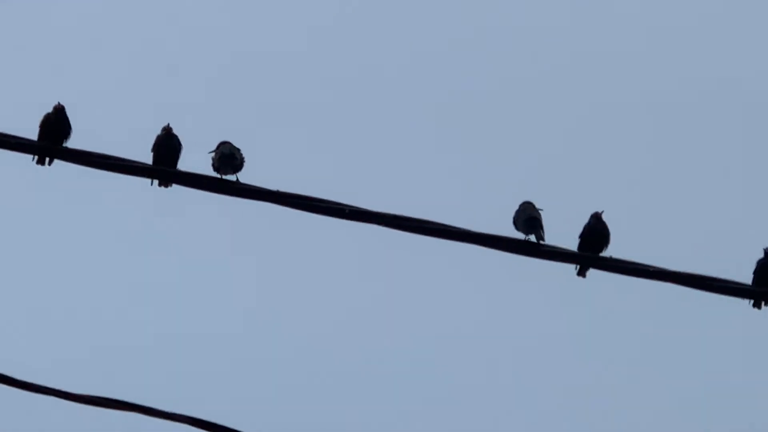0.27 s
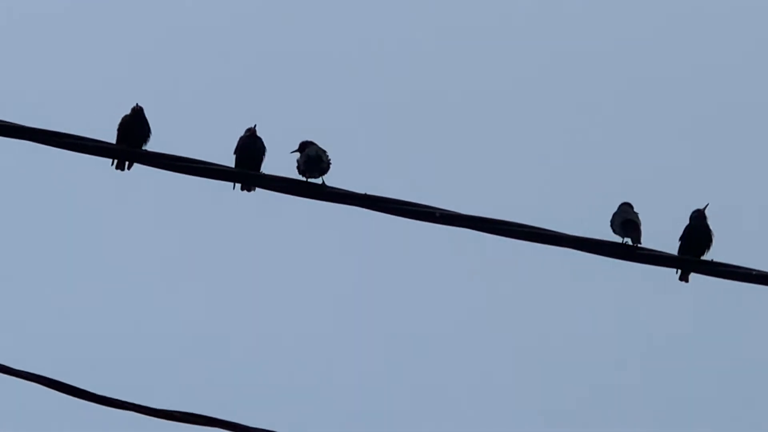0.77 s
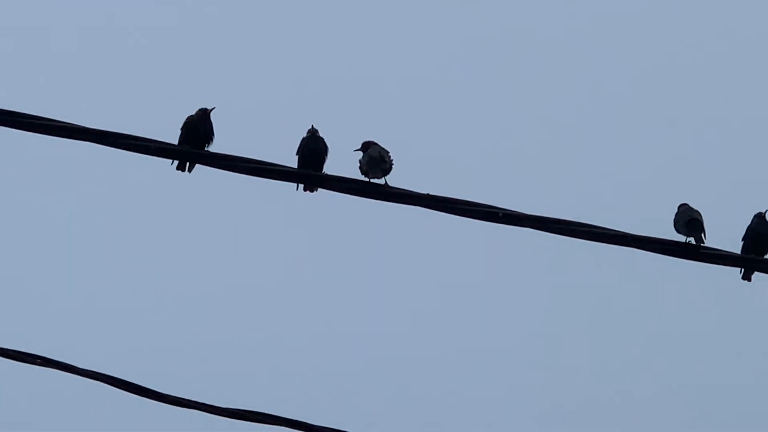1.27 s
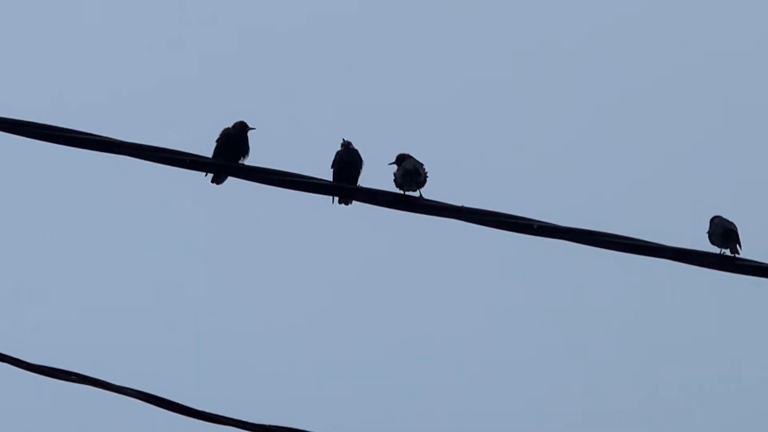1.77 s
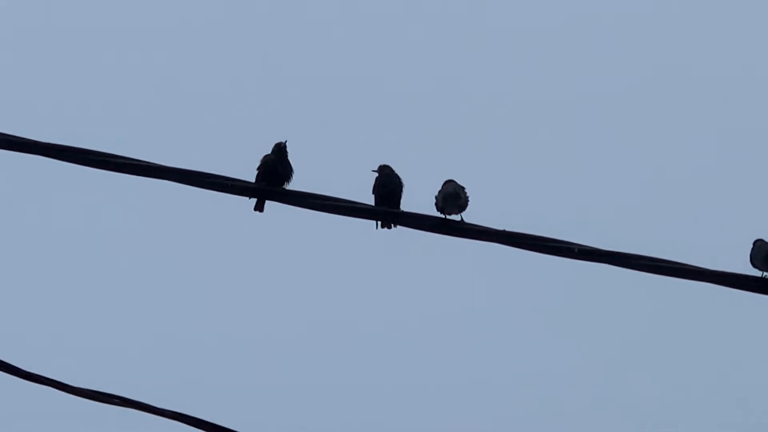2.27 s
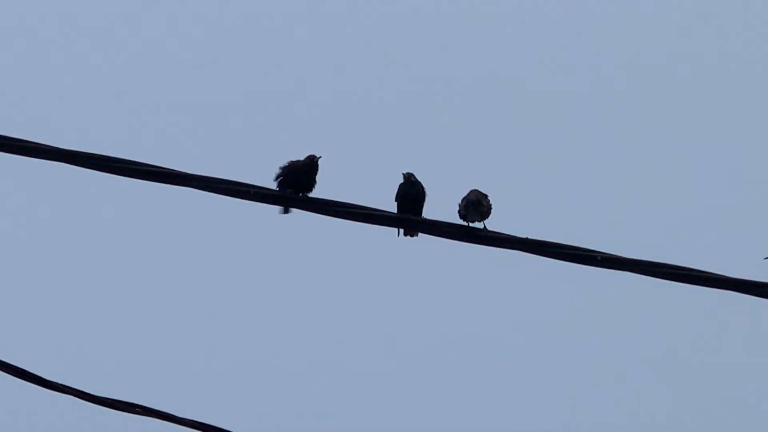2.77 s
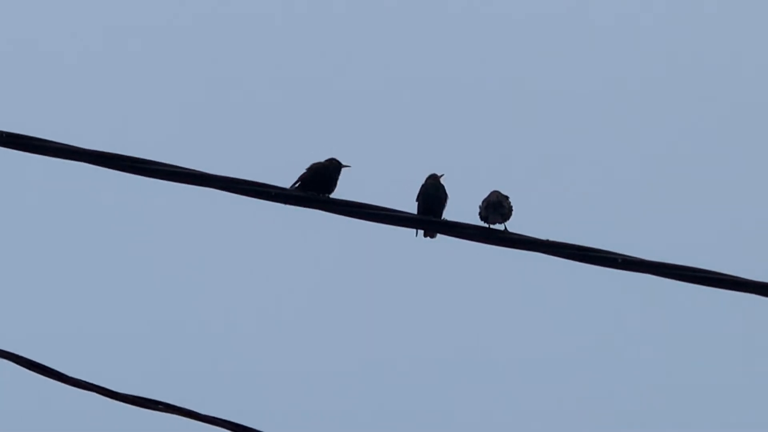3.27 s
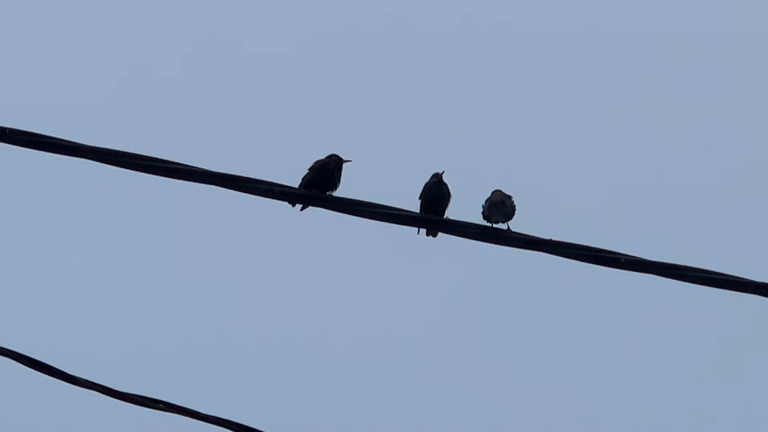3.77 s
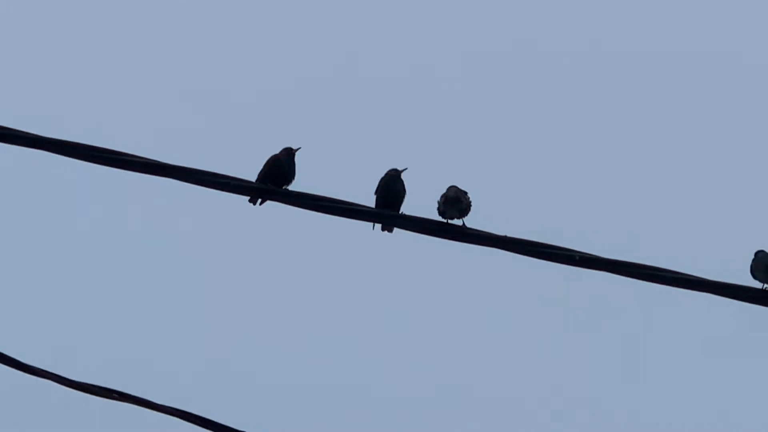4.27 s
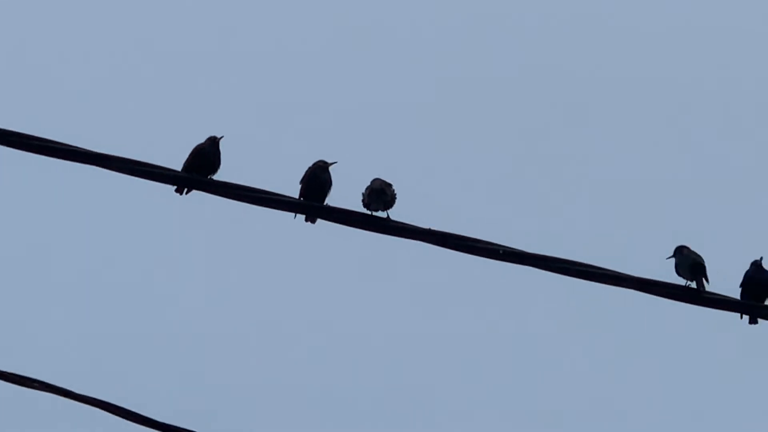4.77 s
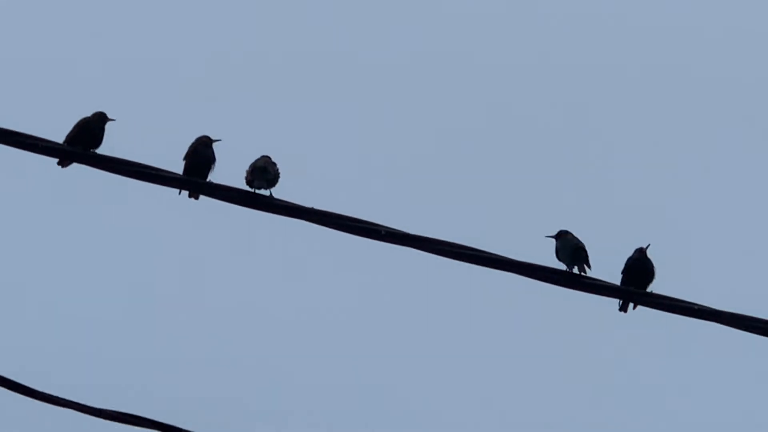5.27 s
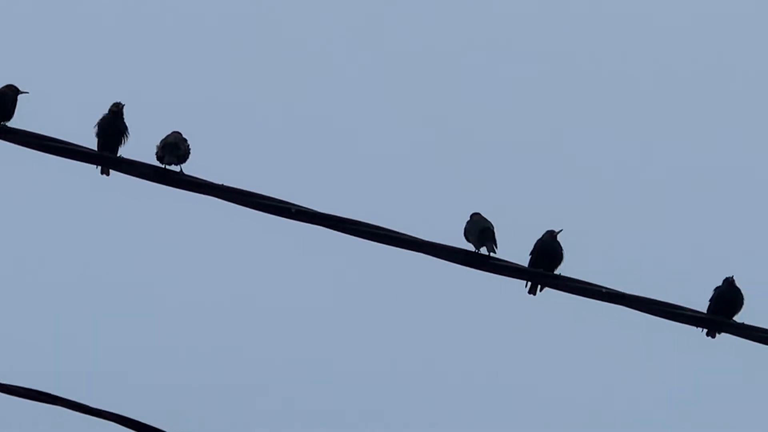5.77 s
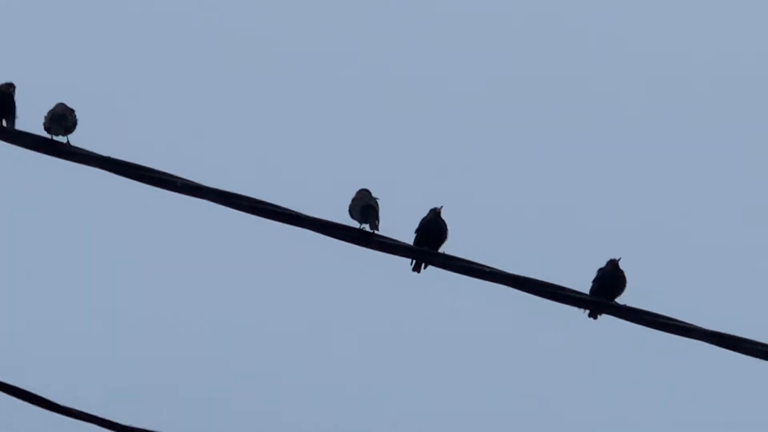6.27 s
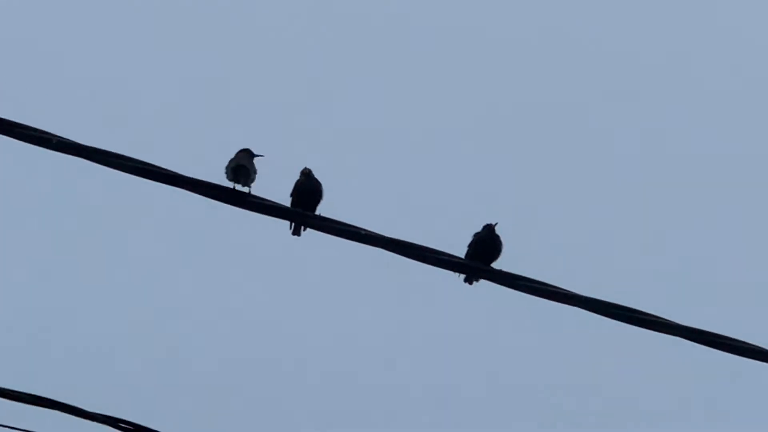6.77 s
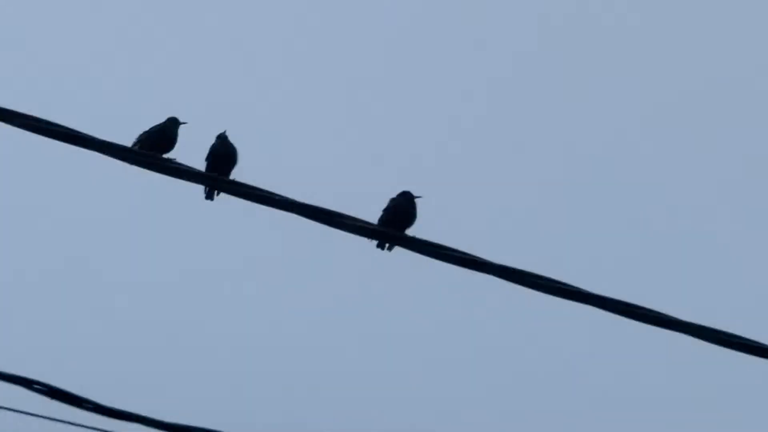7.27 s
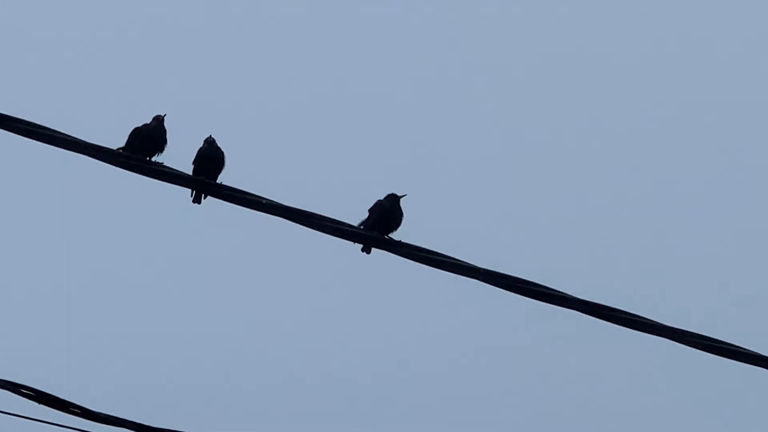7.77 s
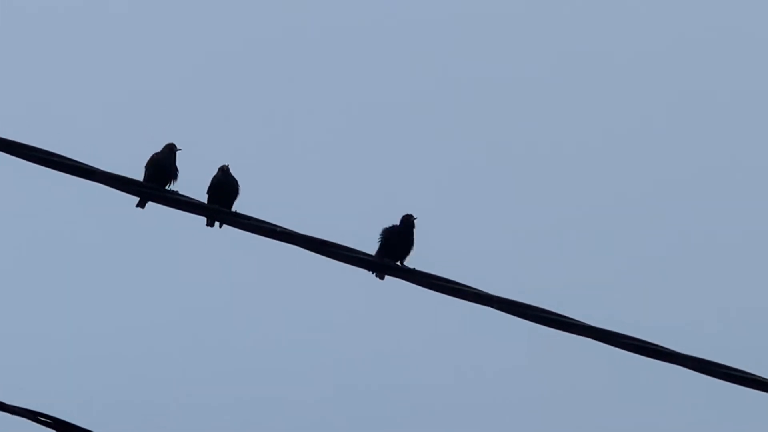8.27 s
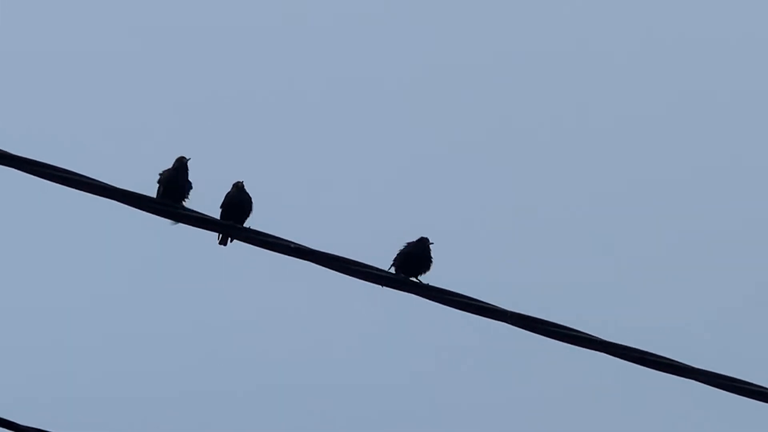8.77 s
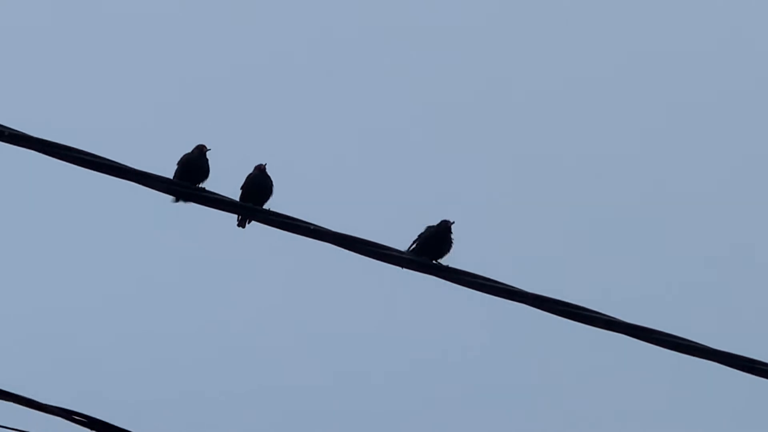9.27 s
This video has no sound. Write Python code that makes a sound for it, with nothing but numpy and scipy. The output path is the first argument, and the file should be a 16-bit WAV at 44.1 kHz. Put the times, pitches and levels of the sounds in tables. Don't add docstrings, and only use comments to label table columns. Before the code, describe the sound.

A small flock on overhead wires chatters, off to the right. One bird repeats a quick two-part chirrup about every second while others give short chirps, husky buzzes and thin high whistles over a washy far flock. Houses return short echoes. Faint low traffic rumble lies underneath, and fingers tick on the handheld camera, much closer than the birds. The chatter grows denser and louder after six seconds.

```python
import sys
import numpy as np
from scipy import signal
from scipy.fft import rfft, irfft, next_fast_len
from scipy.io import wavfile
from scipy.ndimage import uniform_filter1d, map_coordinates

SR = 44100
rng = np.random.default_rng(int(sys.argv[2]) if len(sys.argv) > 2 else 0)


def put_to_file(sound):
    columns = np.atleast_2d(sound).T
    safe = np.clip(columns, -1, 1)
    whole_steps = np.round(safe * 32767)
    wavfile.write(sys.argv[1], SR, whole_steps.astype(np.int16))


def natural_amplitude(level_db):
    exponent = np.asarray(level_db, float) / 20
    return 10 ** exponent


N = 420713

LAG_S = 10.45 / SR
ARCH, SAG, HOOK = 0.1, -.07, .33


def unit(x):
    return x / np.sqrt(np.mean(x ** 2) + 1e-20)


def along(points, hz):
    f, v = np.transpose(points)
    return np.interp(np.log(hz + 1), np.log(f + 1), v)


def wobble(rate_hz, size=N):
    knots = rng.standard_normal(int(size * rate_hz / SR) + 4)
    return map_coordinates(knots, [np.arange(size) * rate_hz / SR])


def filtered(x, response):
    m = next_fast_len(N + SR // 2)
    return irfft(rfft(x, m) * response(np.fft.rfftfreq(m, 1 / SR)), m)[..., :N]


def rush(spectrum, alike, patchy_db):
    z = signal.stft(rng.standard_normal((2, N)), nperseg=512)[2]
    patches = rng.standard_normal(z.shape[1:])
    patches = unit(uniform_filter1d(uniform_filter1d(patches, 5, 0), 8, 1))
    a, b = signal.istft(z * natural_amplitude(patchy_db * patches), nperseg=512)[1][:, :N]
    angle = np.arccos(np.clip(alike, 0, 1)) / 2
    shared, apart = np.cos(angle) * a, np.sin(angle) * b
    pair = np.array([shared + apart, shared - apart])
    closed = [(spectrum[0][0] * .7, -120)] + list(spectrum) + [(spectrum[-1][0] * 1.1, -120)]
    return unit(filtered(pair, lambda hz: natural_amplitude(along(closed, hz))))


def add(track, s, hz, db, waver_hz, flutter_db, fade_s):
    size = len(hz)
    phase = 2 * np.pi * np.cumsum(hz + waver_hz * wobble(260, size=size)) / SR
    octave = natural_amplitude(-24) * np.clip(hz / 2000 - 2.2, 0, 1) * (hz < 7600)
    tone = np.sin(phase) + octave * np.sin(2 * phase)
    to_nearest_end = np.minimum(np.arange(size), np.arange(size)[::-1])
    edge = np.clip(to_nearest_end / (fade_s * SR), 0, 1)
    note = natural_amplitude(db + flutter_db * wobble(116.2, size=size)) * edge * tone
    part = track[max(round(s * SR), 0):][:size]
    part += note[:len(part)]


def traced(track, rows, waver_hz, flutter_db):
    s, hz, db = np.transpose(rows)
    t = np.arange(s[0], s[-1], 1 / SR)
    smooth_hz = uniform_filter1d(np.interp(t, s, hz), 130)
    add(track, s[0], smooth_hz, np.interp(t, s, db), waver_hz, flutter_db, fade_s=0.0025)


def bent(rows, bend):
    return [(s, length, first, (1 + bend) * (first + last) / 2, last, db) for s, length, first, last, db in rows]


def glides(rows, waver_hz, flutter_db, fade_s):
    track = np.zeros(N)
    for s, length, first, middle, last, db in rows:
        u = np.linspace(0, 1, round(length * SR))
        straight = first + (last - first) * u
        hz = straight + 4 * u * (1 - u) * (middle - (first + last) / 2)
        add(track, s, hz, db, waver_hz, flutter_db, fade_s)
    return track


def background():
    # time_s, level_db
    town_levels = [(0.0, -56.5), (0.74, -64), (0.93, -58), (1.62, -59.5), (1.97, -66), (2.9, -61),
                   (3.64, -64), (4.83, -58.5), (5.34, -63), (6.22, -61.5), (6.67, -65), (7.25, -61.5),
                   (7.68, -68.5), (7.86, -65), (8.29, -67), (8.45, -64), (9.19, -65.5), (9.54, -59.5)]
    # pitch_hz, level_db per Hz
    rumble_spectrum = [(28, -23), (42, 1.5), (62, 0.5), (90, -4), (125, -3), (150, -13.5), (240, -18.5),
                       (420, -36.5)]
    air_spectrum = [(250, -7), (600, -6.5), (1200, -6.5), (2500, -1.5), (6000, -33), (11700, -22),
                    (13600, -22), (15000, -36)]
    # start_s, end_s, level_db
    drones = [
        (2.088, 3.687, -72.5),
        (4.993, 6.499, -72),
    ]
    drone_fade_s = 0.2
    t = np.arange(N) / SR
    lumps_db = np.interp(t, *np.transpose(town_levels)) + 2.5 + 2.2 * wobble(7) + 1.4 * wobble(23)
    rumble = natural_amplitude(lumps_db) * rush(rumble_spectrum, alike=.87, patchy_db=1.5)
    drone_gain = np.zeros(N)
    for s, end, db in drones:
        drone_gain += natural_amplitude(db) * np.clip(np.minimum(t - s, end - t) / drone_fade_s, 0, 1)
    drone = drone_gain * rush([(230, -17.5), (258, -2.5), (290, -22.0)], alike=0.39, patchy_db=3.0)
    return rumble + drone + natural_amplitude(-67.0) * rush(air_spectrum, alike=0.041, patchy_db=4.0)


def swells(rows):
    half_width_s = 0.19
    t = np.arange(0, N, 64) / SR
    db = sum(rise_db * np.exp(-((t - s) / half_width_s) ** 2) for s, rise_db in rows)
    return np.interp(np.arange(N) / SR, t, db)


def flock():
    # pitch_hz, level_db per Hz
    chatter_spectrum = [(880, -28), (1500, -28), (1860, -10.5), (3980, -9.5), (5470, -13), (6500, -17.5),
                        (8450, -40), (14300, -120)]
    wheeze_spectrum = [(3240, -40), (5500, -5.5), (6580, -2), (7290, -13.5), (8700, -10.5), (11000, -40),
                       (14300, -68), (22000, -120)]
    # time_s, rise_db
    chatter_swells = [(0, 3), (.56, 1.5), (1.12, 2), (1.96, 2), (2.4, 3.5), (3.95, 3.5), (4.25, 1),
                      (4.8, 4.5), (5.88, 3.5), (6.44, 6.5), (7.0, 5), (7.3, 5.5), (7.9, 10.5), (8.4, 4.5),
                      (8.96, 8), (9.3, 4), (9.55, 2)]
    wheeze_swells = [(.35, 8.5), (1.15, 5.5), (2.05, 8), (2.8, 5), (3.45, 6), (4.3, 9), (5.65, 9),
                     (6.5, 7.5), (7.28, 10), (8.15, 6), (8.4, 15), (8.96, 11.5)]
    chatter_db, wheeze_db = -56 + swells(chatter_swells), -67 + swells(wheeze_swells)
    when, length, low, high, first, last, size = rng.random((1000, 7)).T
    hz = 3600 * np.exp(.4 * (low + high - 1))
    first_hz, last_hz = hz * (.7 + .6 * first), hz * (.65 + .6 * last)
    rows = np.transpose([when * N / SR, .01 + .03 * length, first_hz, hz, last_hz, -6 * size])
    chirps = unit(glides(rows, waver_hz=55, flutter_db=4, fade_s=.004))
    wash = rush(chatter_spectrum, alike=0.067, patchy_db=7.0)
    wheeze = rush(wheeze_spectrum, alike=0.47, patchy_db=5.5)
    return natural_amplitude(chatter_db - 8.5) * chirps, natural_amplitude(chatter_db - 12.5) * wash + natural_amplitude(wheeze_db - 5) * wheeze


def quick_notes():
    sweeps = [
        (.172, 0.09, 1333, 1284, -63.5),
        (1.17, 0.074, 1330, 1250, -65),
        (5.484, .028, 4250, 5150, -56),
        (5.766, 0.027, 4420, 3490, -47),
        (6.833, 0.021, 475, 505, -48),
        (7.895, 0.038, 3220, 2920, -51),
        (9.005, .025, 6000, 9900, -55),
              (7.788, .013, 4500, 3400, -46), (7.806, .013, 4500, 3400, -47),
               (7.828, .022, 3200, 4700, -48), (0.026, .017, 3500, 4800, -59),
               (1.855, .015, 3700, 4690, -52), (4.37, 0.025, 3600, 5200, -56),
               (5.25, .012, 3700, 5380, -55), (7.439, 0.017, 3500, 5000, -58),
               (8.267, .018, 3400, 4700, -55), (6.488, .012, 3500, 5400, -52),
               (0.44, 0.022, 4800, 2500, -59.5), (.5, .018, 4300, 3000, -54),
               (0.608, .016, 1600, 3300, -46), (.626, 0.011, 2800, 2000, -47),
               (0.666, 0.023, 2100, 2020, -55), (0.683, .02, 3900, 4820, -57),
               (1.034, 0.057, 1720, 1677, -61), (1.474, .035, 2350, 2090, -55),
               (2.105, .027, 2100, 2350, -56), (2.44, 0.027, 4000, 3390, -45.5),
               (2.464, .02, 3900, 3580, -54.5), (3.212, 0.022, 4600, 3500, -58),
               (3.338, 0.035, 3900, 4110, -50.5), (3.703, .025, 4300, 4050, -49),
               (4.772, .03, 3980, 4050, -51), (4.802, .008, 4100, 3100, -51), (4.885, .03, 3600, 4350, -51),
               (7.985, .02, 4500, 3500, -45), (5.693, .026, 3600, 2950, -54),
               (6.08, .018, 4600, 4400, -52.5), (7.601, 0.0338, 4300, 4720, -60),
               (7.664, .012, 3300, 4500, -55), (7.682, .02, 4300, 3290, -58), (7.74, .025, 3500, 4500, -55),
               (8.919, 0.032, 4800, 4100, -53), (8.944, 0.022, 3600, 4280, -51),
               (9.169, 0.029, 3100, 3900, -51), (9.042, 0.042, 9300, 9700, -58),
               (.345, 0.018, 6000, 6900, -61), (.268, 0.024, 5100, 5450, -57),
               (4.366, 0.028, 8600, 7700, -63.5), (5.145, 0.036, 4900, 3990, -60)]
    hooks = [
        (4.176, 0.038, 3500, 3500, -50),
        (5.75, 0.017, 4110, 4050, -51.5),
        (5.818, .034, 2800, 3200, -54),
        (5.65, .03, 3300, 3500, -58),
        (6.826, .04, 3300, 3700, -53),
        (7.203, .028, 3900, 4000, -53),
    ]
    return glides(bent(sweeps, 0) + bent(hooks, HOOK), waver_hz=8.6, flutter_db=2.5, fade_s=.004)


def chirruper():
    # time_s from the dip or top, pitch_hz, level_db
    zigzag = [
        (-.042, 5450, -14),
        (-.034, 5350, -7),
        (-.02, 5100, -4.5),
        (-.01, 4520, -1.5),
        (0, 3640, 3),
        (.006, 4300, 2),
        (.011, 4500, 0.5),
        (.019, 3400, -3),
    ]
    closing = [
        (-.03, 3300, -8),
        (-.021, 3600, -4),
        (-.012, 4060, -1),
        (-.005, 4370, -0.5),
        (.002, 4440, -0.5),
        (.008, 4100, 1),
        (.015, 3400, 0),
    ]
    # time_s, pitch_factor, length_factor, level_db
    zigzag_repeats = [(.086, 1.05, 0.92, -55), (1.198, 1.01, 0.93, -56.5), (1.907, 1.04, 0.97, -47.5),
                      (2.623, 0.99, 0.84, -49.5), (3.391, 0.99, 1, -49), (4.428, 1.01, 0.94, -47.5),
                      (5.296, 1, 0.94, -49.5), (5.947, 0.98, 0.91, -49.5), (6.538, 1.03, 1, -45.5),
                      (7.492, 0.98, 1, -45), (8.321, 1.01, .75, -53), (9.003, .99, .8, -52)]
    closing_repeats = [(.141, 1, 0.81, -50), (1.253, .99, .9, -57.5), (1.961, 1.04, 1.04, -49.5),
                       (2.678, 1, 1, -49), (3.447, 1.07, 1.12, -50), (4.483, 0.99, 0.88, -47),
                       (5.357, 0.99, 0.86, -50), (6.0, 1.02, 0.78, -49.5), (6.594, 1.04, 1, -45.5),
                       (7.544, 1.004, 0.83, -47), (8.376, 1, .9, -54), (9.055, 0.97, 0.75, -49)]
    track = np.zeros(N)
    for shape, repeats in ((zigzag, zigzag_repeats), (closing, closing_repeats)):
        for s, pitch, stretch, db in repeats:
            rows = np.array(shape) * [stretch, pitch, 1] + [s, 0, db + 5]
            traced(track, rows, waver_hz=29.4, flutter_db=0.0)
    return track


def fingers():
    # time_s, peak_db, thump_db against the ring
    ticks = [(.089, -36, -8), (0.103, -37, -3), (.435, -47, -0.5), (0.474, -40.5, -8.5), (2.252, -50, -10),
             (3.255, -55.5, 3.5), (4.75, -58, 4), (1.281, -52, 5.5), (1.311, -43.5, -14), (1.468, -23, -17),
             (1.816, -27, -18.5), (2.151, -23.5, -21), (2.455, -32, -19.5), (2.481, -35, -15.5),
             (3.003, -46, -8.5), (4.529, -41.5, -9), (5.164, -48.5, 3), (7.022, -48, 1),
             (7.309, -36.5, -7.5), (7.329, -46, -5), (7.361, -46, 1.5), (7.368, -42.5, 3.5),
             (7.483, -26.5, -17), (7.867, -21.5, -18.5), (8.398, -29.5, -14), (8.663, -30.5, -19.5),
             (8.705, -43, -13)]
    shell_hz = 834
    track, t = np.zeros((2, N)), np.arange(SR // 16) / SR
    ring = np.sin(2 * np.pi * shell_hz * t) * (t / 0.0019) ** 2 * np.exp(2 - 2 * t / 0.0016)
    crack = 0.3 * np.sin(2 * np.pi * 1700 * t) * t / 0.00061 * np.exp(1 - t / 0.0004)
    sink = 2 * np.pi * (65 * t + 2.17 * (1 - np.exp(-t / 0.005)))
    push = np.sin(sink) * t / 0.0093 * np.exp(1 - t / 0.0076)
    for s, db, thump_db in ticks:
        thump = -natural_amplitude(thump_db + 3) * push
        both = natural_amplitude(db) * ((ring + crack) * natural_amplitude([[1.2], [-1.2]]) + thump)
        track[:, round(s * SR) - 36:][:, :len(t)] += both
    side = np.array([[.5], [-.5]])
    return filtered(track, lambda hz: np.exp(-2j * np.pi * hz * 1.266 * LAG_S * side))


def husky_notes():
    # start_s, length_s, first_hz, last_hz, level_db
    more_straight = [(.11, .23, 8600, 7900, -71.5), (.36, .15, 8000, 8400, -71), (.45, .08, 5400, 5500, -61),
                     (2.51, .07, 6100, 5600, -61), (1.635, .07, 4300, 4150, -57), (4.22, .05, 9100, 8200, -61),
                     (5.0, 0.0695, 3150, 3500, -59), (3.385, 0.0714, 3450, 3150, -48.5),
                     (5.3, 0.041, 3650, 3800, -47), (8.635, .06, 3500, 3000, -52), (8.265, .08, 5300, 6800, -57),
                     (7.4, .04, 3300, 3600, -53), (7.303, .055, 4850, 4350, -54)]
    straight = [(2.1, .07, 4400, 4550, -56), (2.15, .05, 3950, 4300, -55), (2.792, 0.15, 3770, 3960, -54),
                (3.125, 0.096, 3690, 3420, -57.5), (3.12, .2, 8900, 6900, -69),
                (1.09, 0.066, 4070, 3990, -56.5), (3.836, .03, 2850, 4000, -50),
                (3.942, 0.1, 4260, 3870, -55), (4.047, 0.15, 9000, 7200, -64), (4.22, .03, 3450, 2900, -53),
                (4.17, .12, 2400, 2950, -59), (4.924, 0.082, 3880, 4060, -55),
                (5.372, .068, 3630, 3270, -51.5), (6.685, 0.047, 3960, 3540, -54.5),
                (7.86, .1, 4150, 3800, -49), (8.06, .07, 5300, 4400, -56), (8.845, .06, 5300, 4900, -53),
                (8.13, .072, 4050, 5050, -56), (.92, .125, 4250, 4400, -58), (8.955, .042, 5000, 5100, -53)]
    arches = [
        (6.25, 0.089, 3700, 3900, -55),
        (6.97, .08, 3800, 3900, -57),
        (6.915, .04, 3000, 3100, -54),
        (1.008, 0.038, 3100, 3100, -53),
        (2.784, 0.063, 5000, 4310, -56.5),
        (3.99, .235, 5600, 5750, -61),
        (4.728, .03, 3500, 2900, -54),
        (9.125, 0.16, 5560, 6500, -55.5),
        (9.482, 0.068, 2650, 2900, -52.5),
    ]
    dips = [
        (1.5, .08, 4200, 3900, -59),
        (2.06, .03, 3250, 3000, -54),
        (2.29, .025, 3500, 4300, -56),
        (4.83, .075, 3000, 3350, -52),
        (8.752, .095, 7300, 6600, -48),
    ]
    rows = bent(straight + more_straight, 0) + bent(arches, ARCH) + bent(dips, SAG)
    return glides(rows, waver_hz=140, flutter_db=4.5, fade_s=.012)


def palm():
    # start_s, length_s, level_db
    rubs = [
        (0.298, 0.2, -69.5),
        (.7, 0.23, -75.5),
        (6.98, .12, -70.5),
    ]
    t = np.arange(N) / SR
    swell = sum(natural_amplitude(db) * np.sin(np.pi * np.clip((t - s) / length, 0, 1)) for s, length, db in rubs)
    rustle = rush([(300, -7), (700, -1), (1100, -7), (1800, -16)], alike=0.74, patchy_db=0.5)
    return swell * natural_amplitude(4.4 * wobble(60)) * rustle


def clear_notes():
    # start_s, length_s, first_hz, last_hz, level_db
    straight = [(9.378, .025, 4350, 3700, -50), (5.518, .04, 3000, 4200, -46.5),
                (2.4, 0.096, 2960, 2650, -54), (2.903, 0.033, 2950, 3700, -52.5),
                (3.063, 0.073, 4080, 3540, -49.5), (3.161, 0.032, 2700, 3010, -48),
                (4.508, 0.049, 3055, 2858, -46.5), (6.39, .035, 4100, 3900, -53),
                (6.465, 0.028, 2860, 3480, -41.5), (7.322, .035, 4130, 3600, -46.5),
                (8.558, .11, 4750, 3950, -52), (6.425, .02, 3300, 3200, -52),
                (9.118, .032, 4400, 3100, -48), (2.488, .06, 3420, 3300, -48), (7.05, .03, 4350, 3600, -49)]
    shrill = [
        (2.87, .22, 9700, 7600, -66),
        (8.195, .055, 8500, 9900, -59),
        (1.636, 0.14, 8070, 8400, -63),
        (3.688, 0.12, 7500, 7740, -66),
        (7.94, .105, 6550, 6550, -52),
        (8.43, .02, 9900, 10400, -61),
        (8.52, 0.043, 10400, 9000, -60),
        (8.565, .045, 9100, 8800, -66),
    ]
    arches = [
        (.58, 0.039, 3770, 3560, -47),
        (.629, .038, 3150, 3150, -46),
        (1.175, 0.033, 3010, 2520, -50.5),
        (7.368, .028, 2900, 3400, -48),
        (8.068, .062, 3200, 3550, -52),
        (6.893, .04, 2950, 3600, -47),
    ]
    dips = [
        (.945, 0.054, 4200, 4000, -54.5),
        (1.67, 0.079, 3550, 3150, -50.5),
        (3.704, 0.036, 3800, 3800, -53),
        (5.11, 0.033, 8880, 7850, -60),
        (8.504, .055, 6300, 4800, -46),
        (9.3, .028, 7800, 6800, -57),
    ]
    rows = bent(straight + shrill, 0) + bent(arches, ARCH) + bent(dips, SAG)
    return glides(rows, waver_hz=40, flutter_db=2.6, fade_s=.006)


def rattles():
    # start_s, length_s, ring_hz, level_db
    bursts = [
        (.668, .03, 3300, -64),
        (6.61, .06, 1500, -76),
        (.62, .035, 2500, -67),
        (6.59, .08, 2340, -69),
        (6.372, 0.045, 8810, -62.5),
        (7.228, .03, 9000, -63.5),
        (7.26, .035, 8480, -64),
        (8.158, .025, 8480, -72.5),
        (9.298, .028, 7350, -70.5),
    ]
    clicks_per_s = 165
    track, t = np.zeros(N), np.arange(SR // 100) / SR
    for s, length, hz, db in bursts:
        for start in np.arange(s, s + length, 1 / clicks_per_s):
            tone = np.sin(2 * np.pi * (hz + 280 * rng.normal()) * t)
            click = tone * t / 0.00036 * np.exp(1 - t / 0.00075)
            track[round(start * SR):][:len(t)] += natural_amplitude(db + 18.0 + 1.8 * rng.normal()) * click
    return track


def whistler():
    # time_s, pitch_hz, level_db
    whistles = [
        [(1.12, 7640, -82), (1.144, 8198, -59), (1.154, 8200, -59), (1.168, 8733, -58), (1.196, 8668, -54),
         (1.212, 8812, -68), (1.226, 9100, -60), (1.28, 9000, -74), (1.29, 8522, -86)],
        [(5.415, 7450, -73), (5.427, 8400, -53), (5.445, 8000, -50), (5.467, 8338, -50), (5.481, 8296, -53),
         (5.489, 8645, -51), (5.505, 8507, -48.5), (5.521, 8764, -48), (5.53, 8469, -60)],
        [(5.53, 8422, -54), (5.536, 8240, -60), (5.552, 8800, -49), (5.566, 8683, -48.5), (5.612, 8867, -72),
         (5.618, 8897, -55.5), (5.65, 8501, -58), (5.664, 9300, -71), (5.68, 8877, -67)],
        [(6.46, 8306, -63), (6.47, 8986, -51), (6.486, 9400, -49.5), (6.53, 9138, -38), (6.558, 8930, -40),
         (6.622, 8828, -51), (6.662, 8903, -46.5), (6.72, 8920, -61), (6.76, 8400, -83)],
        [(7.31, 7600, -72), (7.332, 8748, -44), (7.35, 9008, -40), (7.386, 8920, -41), (7.404, 9030, -37.5),
         (7.44, 8960, -46.5), (7.49, 9250, -47.5), (7.526, 9110, -50), (7.55, 8928, -70)],
    ]
    track = np.zeros(N)
    for rows in whistles:
        traced(track, np.array(rows) + [0, 0, 5], waver_hz=70, flutter_db=1.0)
    return track


def phrases():
    # time_s, pitch_hz, level_db
    calls = [
        [(3.33, 6000, -61), (3.38, 6250, -48), (3.42, 6750, -44.5), (3.47, 6580, -49), (3.52, 5630, -59)],
        [(4.812, 3990, -54), (4.822, 4700, -46), (4.831, 5400, -63), (4.844, 4600, -46), (4.855, 3600, -56),
         (4.863, 4000, -62), (4.871, 5000, -55), (4.88, 4600, -66)],
        [(3.9, 2715, -53), (3.96, 2256, -59), (4.0, 1880, -45.5), (4.1, 1784, -69), (4.3, 1545, -58),
         (4.36, 1386, -62), (4.5, 1275, -68)],
        [(8.342, 7950, -52), (8.347, 8220, -46), (8.398, 8000, -47), (8.428, 5090, -40.5), (8.442, 4900, -46),
         (8.454, 6260, -34.5), (8.47, 4940, -40)],
    ]
    track = np.zeros(N)
    for rows in calls:
        traced(track, rows, waver_hz=10, flutter_db=1)
    return track


def yard(x):
    # pitch_hz, time_s for the echo to fall by 60 dB
    echo_times = [(1000, 0.14), (4000, 0.39), (10000, 0.0091)]
    out, hop = np.zeros((2, N + SR)), SR // 3
    for start in range(0, N, hop):
        hz, t, z = signal.stft(rng.standard_normal((2, SR // 3)), SR, nperseg=256)
        decay = natural_amplitude(-60 * t / along(echo_times, hz)[:, None])
        tail = signal.istft(z * decay, SR, nperseg=256)[1]
        wet = signal.fftconvolve(x[None, start:start + hop], tail / np.linalg.norm(tail[0]), axes=1)
        out[:, start + 200:][:, :wet.shape[1]] += wet
    return out[:, :N]


def ports(x):
    # pitch_hz, left minus right level_db
    shade = [(1400, 0), (2500, -3), (4500, -5.5), (6300, -5), (7600, 0)]
    side = np.array([[.5], [-.5]])
    return filtered(x, lambda hz: natural_amplitude(side * along(shade, hz)) * np.exp(-2j * np.pi * hz * LAG_S * side))


def scene():
    town = background()
    chirps, wash = flock()
    near = quick_notes() + chirruper() + husky_notes() + clear_notes() + rattles() + whistler() + phrases()
    echoes = yard(natural_amplitude(-9) * near + natural_amplitude(-6) * chirps)
    birds = near + chirps + echoes + wash
    return ports(birds + town) + fingers() + palm()


def roll_off(x):
    return signal.sosfilt(signal.butter(12, 15670, fs=SR, output="sos"), x)


def record(dry):
    return roll_off(dry)


dry = scene()
out = record(dry)
put_to_file(out)
```